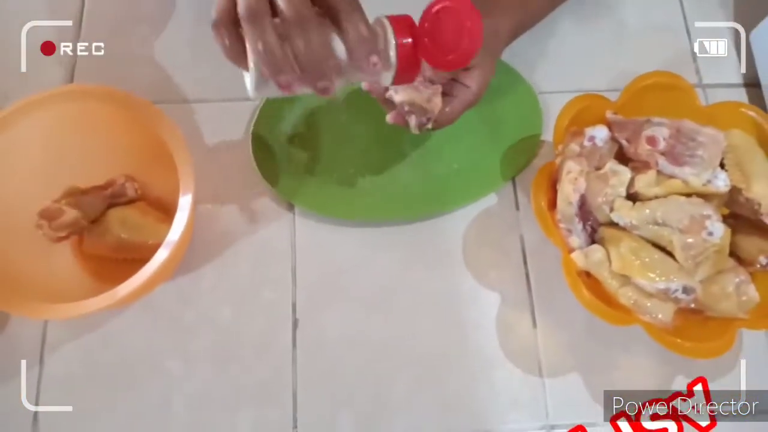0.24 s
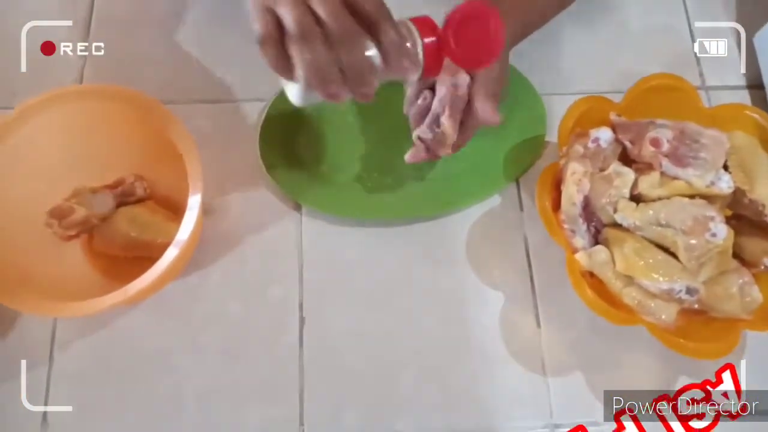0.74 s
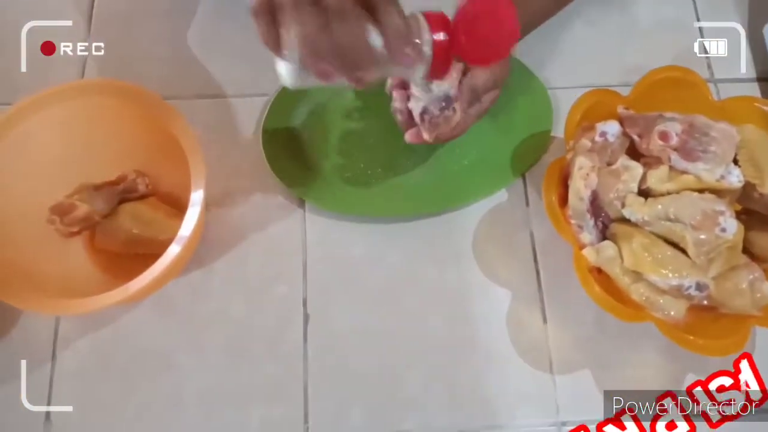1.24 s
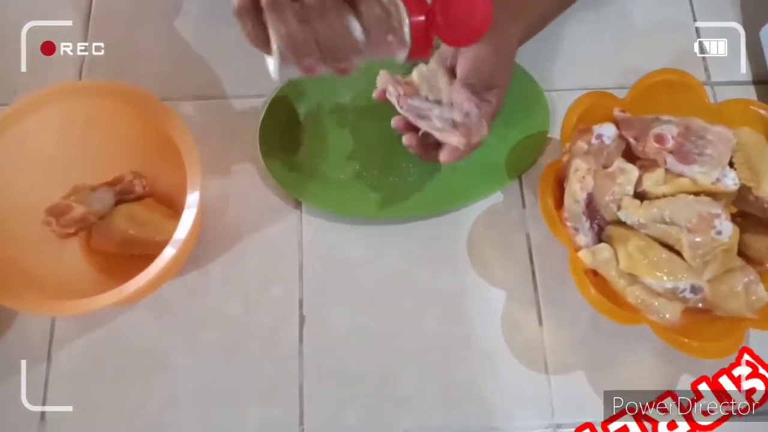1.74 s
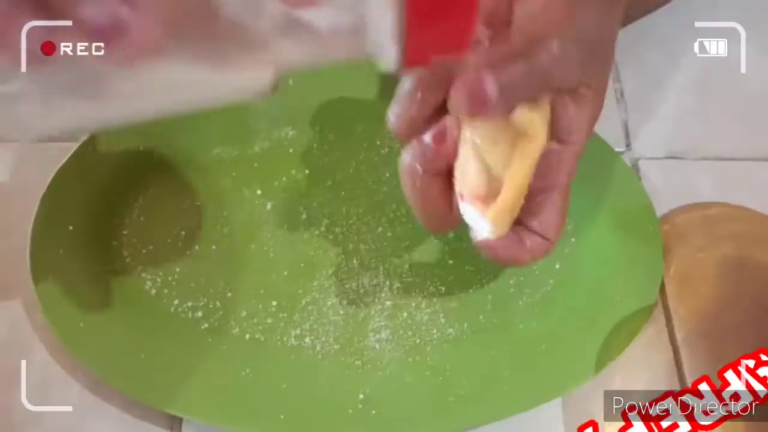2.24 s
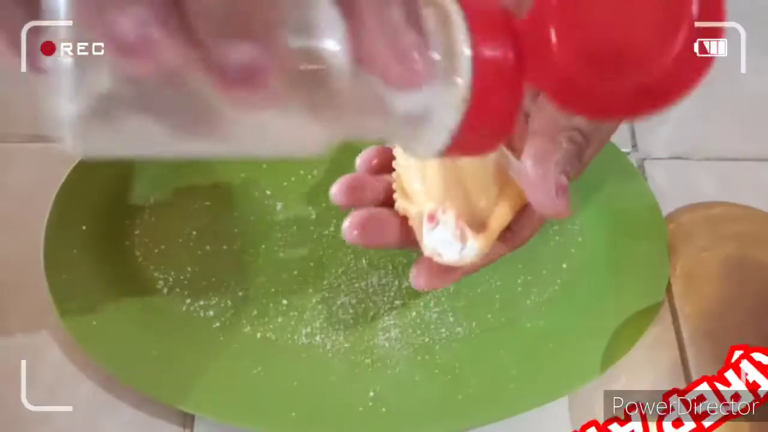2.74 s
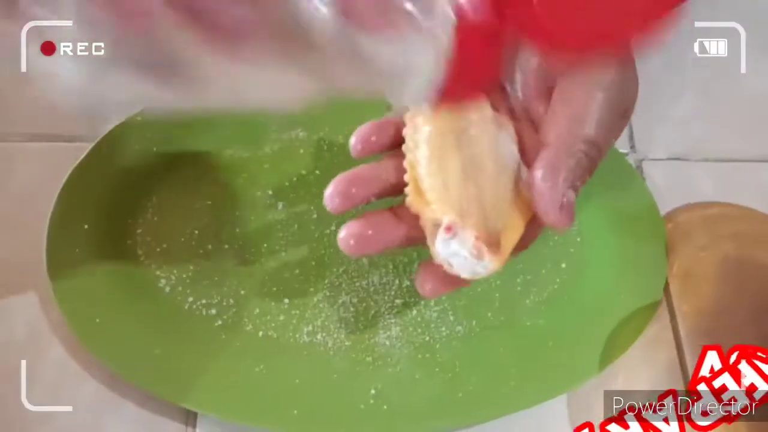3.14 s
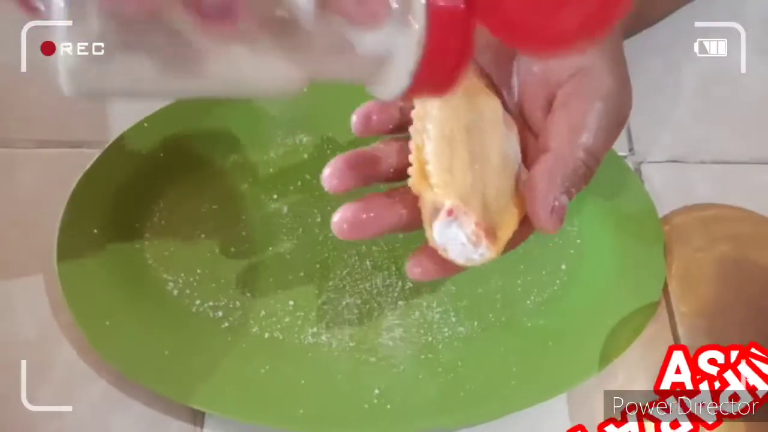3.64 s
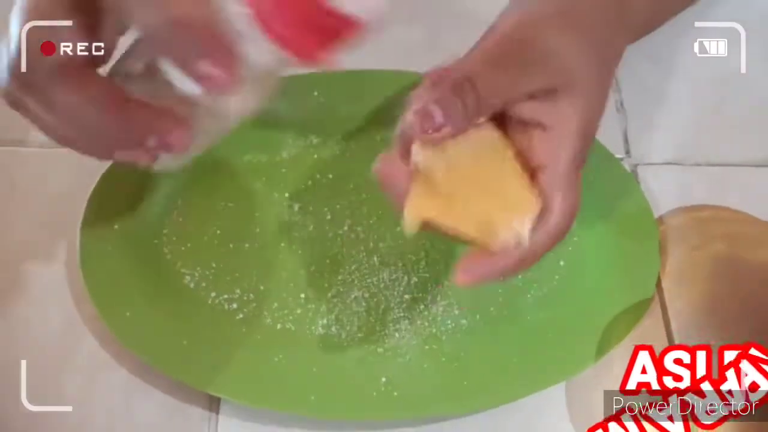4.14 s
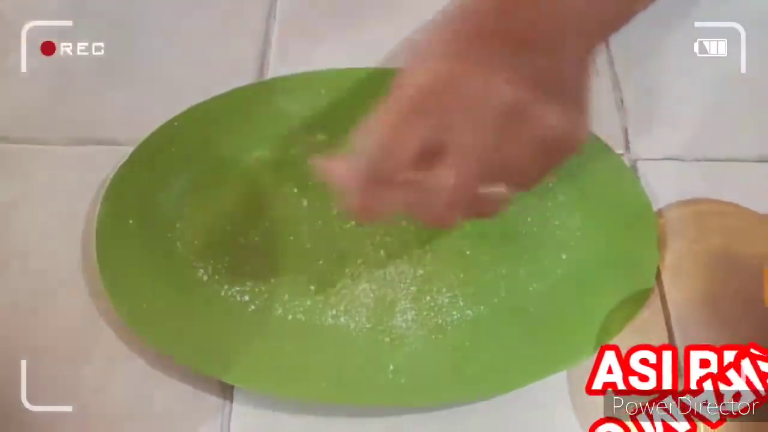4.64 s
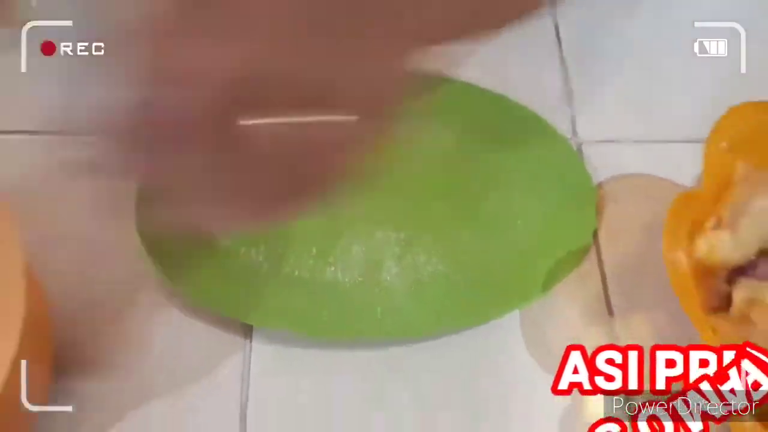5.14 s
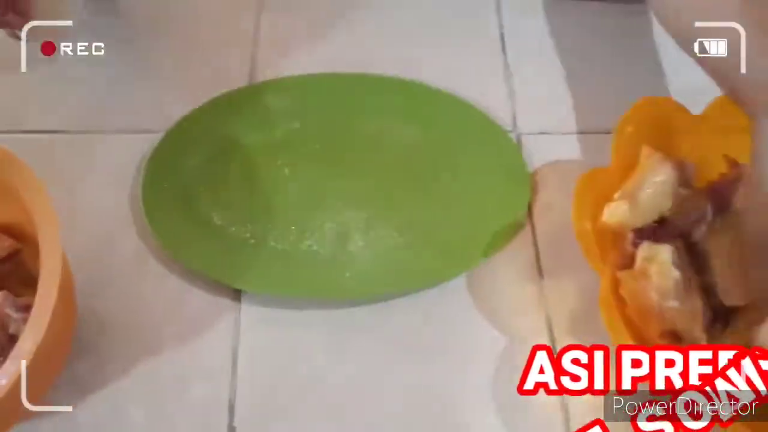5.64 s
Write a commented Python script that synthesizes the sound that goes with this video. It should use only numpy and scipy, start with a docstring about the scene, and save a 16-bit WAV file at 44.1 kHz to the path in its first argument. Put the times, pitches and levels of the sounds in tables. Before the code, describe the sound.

Fine salt rattles softly in a plastic shaker, two to five quick bursts each second, recorded close by phone with crisp, narrow treble. Room noise, low booms and distant husky chirps continue throughout. A faint squeak and swish appear early; later come a loud dry snap, one gritty rub, a run of wet clicks, a light plastic knock and the last sparse shakes.

```python
"""Room noise, low rumble and a swelling hum lie under chirps outside from the start to the end.
Salt shakes run over them: bursts of tiny grain impacts ringing a plastic shaker, close to the phone.
Near one second come the first dull swish, a husky squeak and finger clicks; all three return later.
A dry snap stands out at 3.7 s with a low rustle behind it, then salted skin rubs once at 4.3 s.
More clicks, a plastic knock at 5.1 s and an arched whistle outside come among the last shakes."""
import sys
import numpy as np
from scipy import signal
from scipy.fft import rfft, irfft
from scipy.io import wavfile
from scipy.ndimage import uniform_filter1d

SR = 44100
rng = np.random.default_rng(int(sys.argv[2]) if len(sys.argv) > 2 else 0)


def dump(signal):
    """Clip the signal to [-1, 1] and save it as 16-bit WAV at the path in sys.argv[1]."""
    limited = np.clip(np.atleast_2d(signal).T, -1, 1)
    pcm = np.round(limited * 32767).astype(np.int16)
    wavfile.write(sys.argv[1], SR, pcm)


N = 259440
T = np.arange(N) / SR

# Colour of the room noise. Each row: frequency in Hz, gain in dB.
ROOM_COLOUR = [(25, -20), (38, -10), (65, -3.5), (142, 1), (320, -10), (597, -14.5), (999, -19.5),
               (4680, -25), (5980, -18), (8280, -43.5), (13500, -40), (15000, -33), (16300, -39)]
# Husky chirps outside. Each row: start in seconds, nominal length in seconds, pitch in Hz,
# level in dB, roughness from 0 to 1.
CHIRPS = [(0.128, .13, 3040, -60.5, 0.6), (0.182, 0.091, 3790, -64, 0.47), (0.396, 0.16, 3380, -57, 0.26),
          (1.018, 0.11, 3050, -62, 0.55), (1.425, 0.087, 2295, -64.5, .2), (2.03, 0.099, 3120, -60.5, 0.55),
          (2.059, 0.18, 3800, -63.5, 0.65), (2.266, 0.13, 2060, -65, 0.38), (2.4, 0.085, 3740, -61.5, 0.55),
          (2.956, 0.097, 3610, -59, 0.3), (3.454, 0.083, 3500, -62, 0.24), (4.8, 0.048, 3830, -61, 0.54),
          (5.03, 0.095, 3010, -63, .4), (5.14, 0.11, 3070, -63, .7), (5.198, 0.13, 3790, -66, 0.1),
          (5.276, 0.13, 3010, -59.5, 0.17), (5.431, 0.073, 3940, -62, .3), (5.702, 0.08, 2640, -61.5, 0.42)]
# Arched whistle outside. One row: start, highest point and end in seconds.
WHISTLE_TIMES = (5.335, 5.5, 5.69)
# Low booms. Each row: peak time in seconds, pitch in Hz, level in dB.
BOOMS = [(1.769, 79.7, -60.5), (2.37, 111.6, -53.5), (2.495, 93.35, -55), (2.62, 72, -59),
         (2.949, 111.3, -56), (3.24, 111, -56.5), (3.96, 114.9, -55), (4.15, 99.5, -49), (4.177, 61.4, -53),
         (4.554, 98.3, -54), (4.58, 62.14, -56), (5.601, 92, -60)]
# Swells of the low hum. Each row: peak time in seconds, peak level in dB.
HUM_SWELLS = [(.39, -50.5), (0.709, -52.5), (1.0, -60.5), (4.17, -45), (4.27, -49), (5.04, -58)]
# Breathy squeaks. Each row: start in seconds, nominal length in seconds, first pitch in Hz,
# last pitch in Hz, level in dB.
SQUEAKS = [(0.899, 0.098, 4150, 4330, -64.5), (2.848, 0.089, 6000, 5960, -57),
           (5.226, 0.11, 5450, 6120, -61.5)]
# Dull swishes. Each row: start in seconds, peak level in dB, 60 dB fade time in seconds,
# share of the peak reached at once.
SWISHES = [(.88, -63, 0.48, 0.33), (2.916, -47.5, 0.53, .05), (3.853, -48.5, 0.4, 0.54),
           (4.552, -67, 6.7, 0.35), (4.834, -48.5, 0.57, 0.44), (5.53, -65.5, 1.6, 0.33)]
# Colour of the swishes. Each row: frequency in Hz, gain in dB.
SWISH_COLOUR = [(2900, -24), (3270, -9), (4530, -12.5), (5680, 0), (6560, -2), (9000, -50)]
# Low rustle. One row: start in seconds, end in seconds, level in dB.
RUSTLE = (3.76, 3.858, -59.5)
# Clicks. Each row: start in seconds, peak of the body in dB, centre in Hz, treble peak against it in dB.
CLICKS = [(0.939, -46, 5400, -15), (1.486, -45, 6000, -17), (2.138, -46, 6130, -32),
          (2.2358, -45, 4900, -5), (2.4078, -46, 6160, -1), (4.192, -52, 4900, 3), (4.503, -60, 5800, 12),
          (4.5737, -41.5, 5000, -20), (4.613, -39, 5770, -9), (4.6512, -52, 10100, -3),
          (4.688, -45, 6960, -7), (4.707, -46, 6160, -3), (4.775, -54.5, 6200, 6.5),
          (5.0453, -42.5, 5060, -1), (5.0854, -36, 5900, 2), (5.0892, -38.5, 3700, -28),
          (5.088, -30.5, 5750, -16), (5.6253, -41, 6700, -7), (5.66, -43, 5050, -32),
          (5.717, -40, 5460, -21), (5.7375, -38.5, 5700, -4), (5.8585, -38, 6250, -39)]
# Modes of the plastic knock. Each row: frequency in Hz, relative level in dB, 60 dB decay in seconds.
KNOCK_MODES = [(1360, 5, 0.035), (1857, 7, 0.031), (2300, 0, 0.046), (3800, 8, 0.039)]
# Colour of the snap, microphone resonances included. Each row: frequency in Hz, gain in dB.
SNAP_COLOUR = [(500, -50), (2240, -17.5), (4020, -8), (5980, 4), (6730, 0.5), (8630, -35), (11400, -35),
               (12600, -34), (14900, -18), (16700, -17.5)]
# Colour of the grains, with the microphone's resonances near 6 and 15 kHz.
# Each row: frequency in Hz, gain in dB.
SALT_COLOUR = [(2230, -6.5), (2740, -10), (5070, -7.5), (6430, 9), (9190, -21), (13500, -10.5),
               (14900, 6.5), (15650, -12), (15800, -25)]
# What the shaker rings with. Each row: mode in Hz, lift over its broad colour in dB.
SHAKER_MODES = [(3680, 4.5), (5830, 7), (6400, 2.5), (7050, 4), (7600, 4.5)]
# Shakes. Each row: peak time in seconds, level near 6 kHz in dB, half length in seconds.
SHAKES = [(0.144, -57.5, 0.031), (0.306, -57.5, 0.022), (0.461, -56.5, 0.053), (0.645, -60.5, 0.067),
          (0.848, -57, 0.058), (1.04, -56, 0.058), (1.155, -56, 0.028), (1.236, -55, 0.053),
          (1.425, -52.5, 0.044), (1.784, -56.5, 0.039), (1.995, -55, 0.05), (2.144, -59, 0.024),
          (2.247, -57.5, 0.032), (2.413, -56.5, 0.052), (2.612, -55, 0.07), (2.826, -57.5, 0.046),
          (3.001, -51, 0.049), (3.133, -57, 0.027), (3.201, -54.5, 0.044), (3.332, -63.5, 0.031),
          (3.396, -59.5, 0.043), (3.572, -61, 0.033), (3.683, -58.5, 0.011), (3.759, -58.5, 0.082),
          (3.895, -48, 0.033), (4.713, -63, 0.032), (5.102, -54, 0.022), (5.458, -59, 0.031),
          (5.727, -48.5, 0.024)]
# Brightness of the grains over time. Each row: time in seconds, treble against the body in dB.
SALT_TREBLE = [(1.4, -14.5), (2.17, -21), (2.22, -8), (3.4, 0.5), (3.9, -11.5), (5.1, 0.5), (5.7, -19)]
# Steep flanks of the microphone's resonances and its thin top. Each row: frequency in Hz, gain in dB.
MIC_COLOUR = [(7500, 0.5), (9000, 5.5), (13600, 3.5), (14700, 1), (15500, 11), (15680, -18)]

ROOM_DB = -61.5
CHIRP_BLUR, CHIRP_SAG_PER_S = 0.12, 0.047  # band width and downward slide, as shares of the pitch
CHIRP_WAVER, CHIRP_SPLIT = 0.015, 0.02  # pitch wander and climb of the husky strand, as shares
WHISTLE_HZ, WHISTLE_BEND_HZ_S2, WHISTLE_DB, WHISTLE_FADE_DB_S = 1893, 4000, -57.5, 7.5
RUMBLE_CYCLES = 13  # half length of a boom in its own cycles
RUMBLE_TONE, RUMBLE_BLUR = 0.27, 0.45  # tone gain; noise width as a share of the pitch
HUM_HZ, HUM_RISE_S, HUM_FALL_S = 131, 0.082, 0.034
SQUEAK_BLUR, SQUEAK_SLIDE_S = 0.18, 0.035  # band width as a share of the pitch; slide time
SWISH_RISE_S, SWISH_HOLD = 0.056, 0.092  # hold at the peak is a share of the fade time
STRAYS_PER_S, STRAY_DB, STRAY_SPREAD_DB = 6, -64, 2.5  # lowest level and mean excess over it
KNOCK_S, KNOCK_DB = 5.084, -50
SNAP_S, SNAP_DB = 3.748, -3
SHAKER_WIDTH_HZ = 69
ARRIVE_FASTER = 1.75  # rise of a shake against its trickling out
RUB_START_S, RUB_S, RUB_DB = 4.23, 4.335, -39.5  # first contact, peak time, level
RUB_RISE_DB_S, RUB_FALL_DB_S = 203, 162
RUB_TREBLE_DB, RUB_LOWER_DB = 2.5, -1  # against its body; against the shaker's lower body
TOP_HZ = 16550


def undb(db):
    """dB to gain."""
    return 10 ** (np.asarray(db) / 20)


def level(x, db):
    """Scale to an rms level in dB."""
    return x * undb(db) / np.sqrt(np.mean(x ** 2))


def colour(x, points):
    """Shape the spectrum through (Hz, dB) points on a log frequency axis."""
    hz, db = np.transpose(points)
    f = np.arange(len(x) // 2 + 1) * SR / len(x)
    gain = undb(np.interp(np.log(f + 1), np.log(hz), db))
    return irfft(rfft(x) * gain, len(x))


def band(x, lo_hz, hi_hz):
    """Band-pass."""
    return signal.sosfilt(signal.butter(3, [lo_hz, hi_hz], "band", fs=SR, output="sos"), x)


def walk(rate, size=N):
    """Wander between random levels, held 1 / rate s each and smoothed twice."""
    k = max(int(SR / rate), 1)
    steps = np.repeat(rng.standard_normal(size // k + 1), k)
    return uniform_filter1d(uniform_filter1d(steps, k), k)[:size]


def tone(hz):
    """A sine on a moving pitch."""
    return np.sin(2 * np.pi * np.cumsum(hz) / SR)


def husky(hz, width_hz):
    """A tone on a moving pitch, blurred to a narrow band of noise; rms 1."""
    turn = np.exp(2j * np.pi * np.cumsum(hz) / SR)
    blur = walk(width_hz, size=len(hz)) + 1j * walk(width_hz, size=len(hz))
    return level(np.real(turn * blur), 0)


def patchy(x, patch_db, wide_hz, long_s):
    """Random blotches of level in time and pitch, so that noise sounds uneven."""
    f, t, z = signal.stft(x, SR, nperseg=512)
    bins, frames = max(int(wide_hz / f[1]), 1), max(int(long_s / t[1]), 1)
    field = rng.standard_normal(z.shape)
    for _ in range(2):
        field = uniform_filter1d(uniform_filter1d(field, bins, axis=0), frames, axis=1)
    gain = undb(patch_db * field / field.std())
    return signal.istft(z * gain, SR, nperseg=512)[1][:N]


def add(out, s, x):
    """Mix x in at time s."""
    i = int(s * SR)
    out[i:i + len(x)] += x[:N - i]


def room():
    """Coloured noise with uneven treble and a slowly drifting level."""
    hiss = rng.standard_normal(N)
    uneven = band(hiss, 15, 900) + patchy(band(hiss, 900, 20000), 3, 150, 0.12)
    return level(colour(uneven, ROOM_COLOUR), ROOM_DB) * undb(0.77 * walk(3.9))


def chirps():
    """Sagging chirps that swell and fade: a clear tone with a husky strand climbing off it."""
    out, t = np.zeros(N), T[:SR // 2]
    for s, length, hz, db, rough in CHIRPS:
        swell = np.interp(t / length, [0, 0.12, 0.8, 1.4], [0, 1, 0.8, 0])
        swell = swell * undb(3 * walk(60, size=len(t)))
        waver = CHIRP_WAVER * walk(22.3, size=len(t))
        sag = hz * (1 - CHIRP_SAG_PER_S * (t - length / 2) + waver)
        climb = 1 + CHIRP_SPLIT * np.minimum(t / length, 1)
        strand = husky(sag * climb, CHIRP_BLUR * hz)
        add(out, s, undb(db) * swell * ((1 - rough) * tone(sag) + rough * strand))
    return out


def whistle():
    """One whistle whose unsteady pitch arches up and down, with a little breath around the tone."""
    start, top, end = WHISTLE_TIMES
    arch = np.maximum(WHISTLE_HZ - WHISTLE_BEND_HZ_S2 * (T - top) ** 2, 0)
    hz = arch * (1 + CHIRP_WAVER * walk(30))
    on = np.interp(T, [start, start + 0.025, end - 0.05, end], [0, 1, 1, 0])
    fade = undb(WHISTLE_DB - WHISTLE_FADE_DB_S * np.abs(T - start))
    return on * fade * (tone(hz) + 0.25 * husky(hz, 120))


def rumble():
    """Low booms that swell and fade, part tone and part noise; deeper ones last longer."""
    out = np.zeros(N)
    for s, hz, db in BOOMS:
        noise = husky(np.full(N, hz), RUMBLE_BLUR * hz)
        boom = RUMBLE_TONE * np.sin(2 * np.pi * hz * T) + 0.82 * noise
        out += undb(db) * np.exp(-((T - s) * hz / RUMBLE_CYCLES) ** 2) * boom
    return out


def hum():
    """One low tone, slightly wavering, that swells slowly and falls faster."""
    swell = np.zeros(N)
    for s, db in HUM_SWELLS:
        half = np.where(T < s, HUM_RISE_S, HUM_FALL_S)
        swell += undb(db) * np.exp(-((T - s) / half) ** 2)
    return swell * tone(HUM_HZ * (1 + 0.0097 * walk(7.9)))


def squeaks():
    """Wide husky bands that start at once, slide quickly to their last pitch and fade."""
    out, t = np.zeros(N), T[:SR // 2]
    for s, length, first_hz, last_hz, db in SQUEAKS:
        hz = last_hz + (first_hz - last_hz) * np.exp(-t / SQUEAK_SLIDE_S)
        swell = np.interp(t, [0, 0.004, 0.82 * length, 1.17 * length], [0.37, 1, 0.98, 0.036])
        add(out, s, undb(db) * swell * husky(hz, SQUEAK_BLUR * last_hz))
    return out


def swishes():
    """Dull patchy hiss that sets in, swells, holds and fades, flickering a little."""
    swell = np.zeros(N)
    for s, db, t60, jump in SWISHES:
        fade_s = np.maximum(T - s - SWISH_RISE_S - SWISH_HOLD * t60, 0)
        rise = np.interp(T, [s - 0.003, s, s + SWISH_RISE_S], [0, jump, 1])
        swell += undb(db) * rise * np.exp(-np.log(1000) * fade_s / t60)
    hiss = patchy(colour(rng.standard_normal(N), SWISH_COLOUR), 4.2, 180, 0.093)
    return swell * undb(walk(50)) * level(hiss, 0)


def rustle():
    """Low noise that swells gradually and stops abruptly."""
    start, end, db = RUSTLE
    swell = np.interp(T, [start, start + 0.07, end, end + 0.0031], [0, 1, 1, 0])
    low = colour(rng.standard_normal(N), [(300, -4), (500, 4.5), (2200, -5.5), (3500, -41)])
    return swell * level(low, db)


def strays():
    """Faint ticks of stray grains as click rows, at random times and colours."""
    rows = []
    for when, loud, pitch, bright in rng.random((int(STRAYS_PER_S * N / SR), 4)):
        db = STRAY_DB - STRAY_SPREAD_DB * np.log(1 - loud)
        rows.append((when * N / SR, db, 4500 + 2500 * pitch, -16 + 14 * bright))
    return rows


def clicks():
    """Wet fingers and stray grains: short noisy rings with a bounce and a crack of treble."""
    out, t = np.zeros(N), T[:2048]
    for s, db, hz, treble_db in CLICKS + strays():
        bounce_s = 0.00043 + 0.00085 * rng.random()
        bounce = 0.5 * (t > bounce_s) * np.exp(-(t - bounce_s) / 0.0018)
        shape = np.exp(-t / 0.00075) + bounce + 0.24 * np.exp(-t / 0.012)
        noise = rng.standard_normal(len(t))
        body = band(noise * shape, 0.914 * hz, 1.143 * hz)
        # filtered before and after shaping, so the crack stays free of lower sound
        crack = band(band(colour(noise, SALT_COLOUR), 8500, 18000) * shape, 8500, 18000)
        crack = undb(treble_db) * crack / np.abs(crack).max()
        add(out, s, undb(db) * (body / np.abs(body).max() + crack))
    return out


def knock():
    """Decaying plastic modes after a soft contact, then one weaker bounce."""
    out, t = np.zeros(N), T[:8192]
    hit = np.zeros(len(t))
    for hz, db, t60 in KNOCK_MODES:
        hit += undb(db) * np.sin(2 * np.pi * hz * t) * np.exp(-np.log(1000) * t / t60)
    hit *= undb(KNOCK_DB) * (1 - np.exp(-t / 0.001))
    add(out, KNOCK_S, hit)
    add(out, KNOCK_S + 0.012, 0.4 * hit)
    return out


def snap():
    """One sharp dry snap: a single coloured impulse."""
    out, impulse = np.zeros(N), np.zeros(8192)
    impulse[0] = 1
    pulse = np.roll(colour(impulse, SNAP_COLOUR), 4096)  # peak moved to mid-buffer
    add(out, SNAP_S - 4096 / SR, undb(SNAP_DB) * pulse / pulse.max())
    return out


def ring(x):
    """Lift narrow bands at the shaker's modes."""
    f = np.arange(len(x) // 2 + 1) * SR / len(x)
    lift_db = sum(db / (1 + ((f - hz) / SHAKER_WIDTH_HZ) ** 2) for hz, db in SHAKER_MODES)
    return irfft(rfft(x) * undb(lift_db), len(x))


def grain_texture():
    """Tiny impacts of unequal size, each skipping briefly, over even hiss, ringing the shaker."""
    impacts = rng.random(N) < 1500 / SR  # 1500 grains per second
    size = undb(3 * np.minimum(rng.exponential(size=N), 4)) * impacts
    skip = np.exp(-np.arange(200) / (0.001 * SR))
    grit = level(np.convolve(size, skip)[:N] * rng.standard_normal(N), 0)
    return ring(colour(0.46 * grit + 0.5 * rng.standard_normal(N), SALT_COLOUR))


def shake_swell():
    """Each shake arrives fast and trickles out more slowly."""
    swell = np.zeros(N)
    for s, db, half in SHAKES:
        late = (T - s) / max(half, 0.005)
        swell += undb(db) * np.exp(-np.where(late < 0, ARRIVE_FASTER * late, late) ** 2)
    return swell


def rub_swell():
    """Salted skin rubbed once: a swell and fade straight in dB, opened at first contact."""
    drop_db = np.maximum(RUB_RISE_DB_S * (RUB_S - T), RUB_FALL_DB_S * (T - RUB_S))
    contact = np.interp(T, [RUB_START_S - 0.02, RUB_START_S + 0.026], [0, 1])
    return undb(RUB_DB - drop_db) * contact


def salt():
    """Shakes and rub drive the grains in three bands, whose balance sets how bright they sound."""
    shakes, rub = shake_swell(), rub_swell()
    bright = shakes * undb(np.interp(T, *np.transpose(SALT_TREBLE)))
    even = grain_texture()
    grains = patchy(even, 3.8, 220, 0.04)
    # bright bursts also carry more of the shaker's lower body
    lower_swell = 0.3 * shakes + 0.7 * bright + rub * undb(RUB_LOWER_DB)
    lower = lower_swell * level(band(even + grains, 2700, 4900), -7.5)
    body = (shakes + rub) * level(band(grains, 5000, 8140), 0)
    treble = (bright + rub * undb(RUB_TREBLE_DB)) * level(band(grains, 6680, 14000), 0)
    return lower + body + treble


def scene():
    """All sources mixed, from the room up to the salt."""
    background = room() + chirps() + whistle() + rumble() + hum()
    handling = squeaks() + swishes() + rustle() + clicks() + knock() + snap()
    return (background + handling + salt())[None]


def record(dry):
    """The microphone colours the treble; a steep cut ends it."""
    top_cut = signal.ellip(8, 0.2, 70, TOP_HZ, fs=SR, output="sos")
    return signal.sosfilt(top_cut, colour(dry[0], MIC_COLOUR)[None])


dry = scene()
out = record(dry)
dump(out)
```